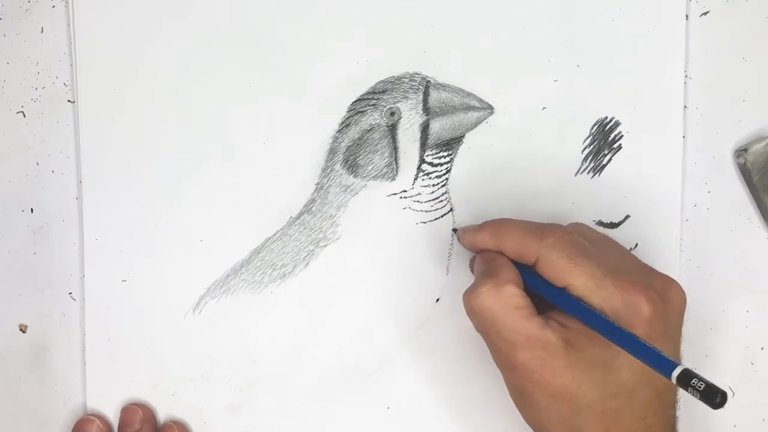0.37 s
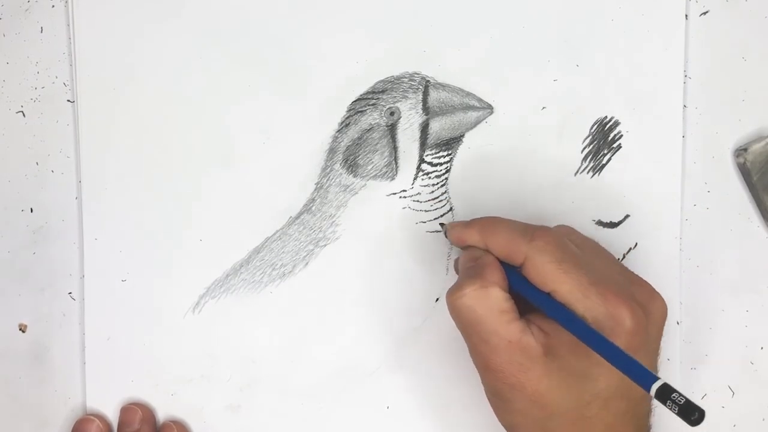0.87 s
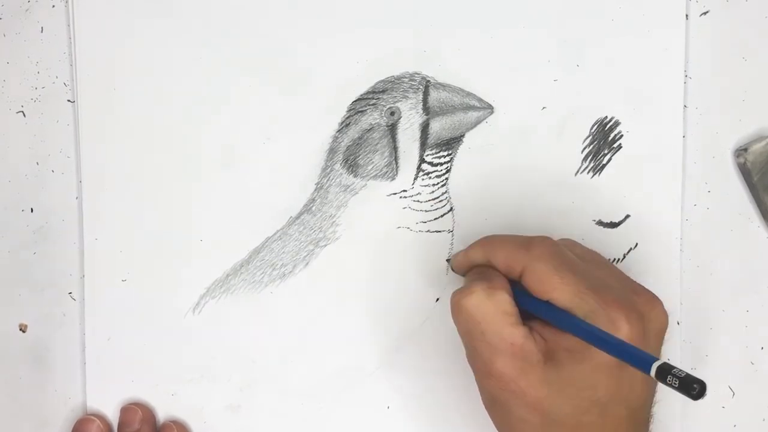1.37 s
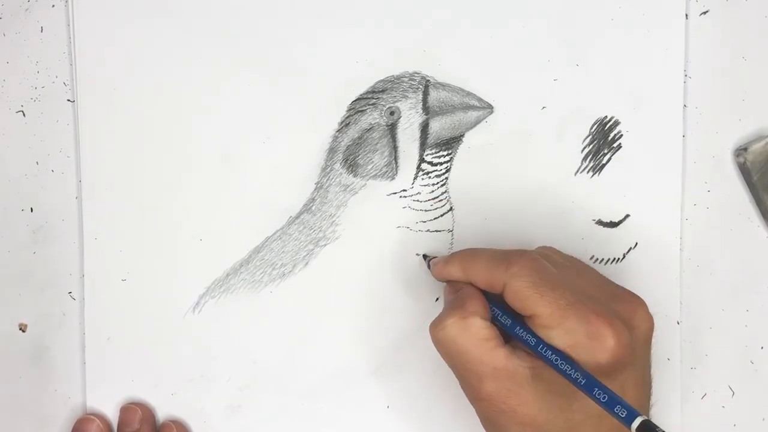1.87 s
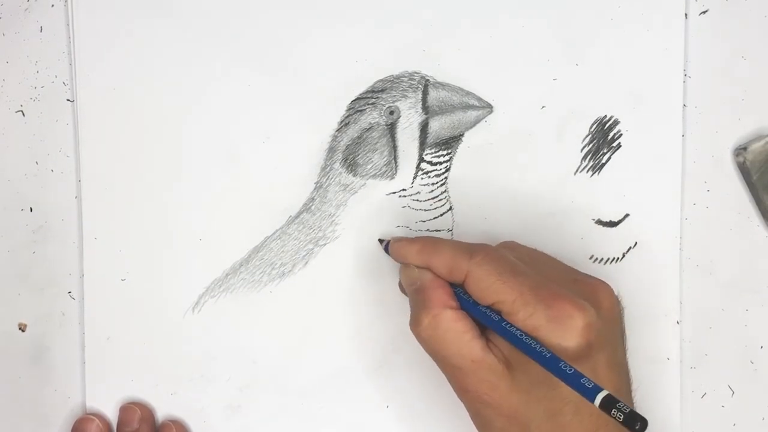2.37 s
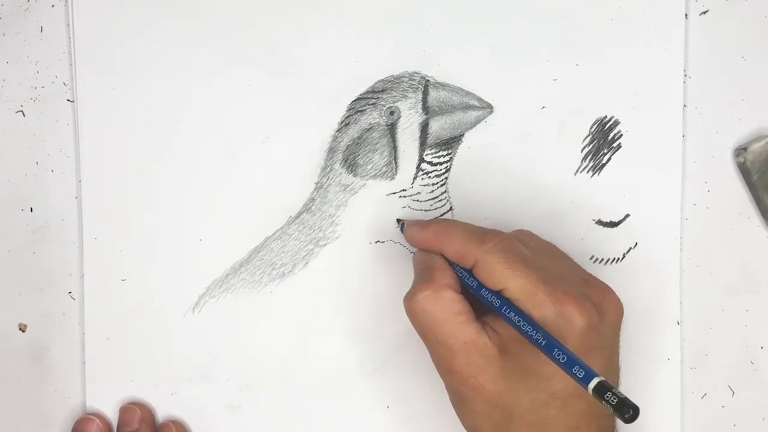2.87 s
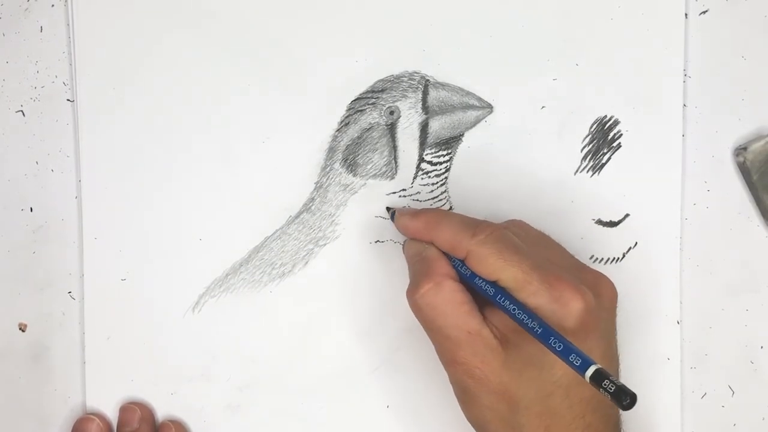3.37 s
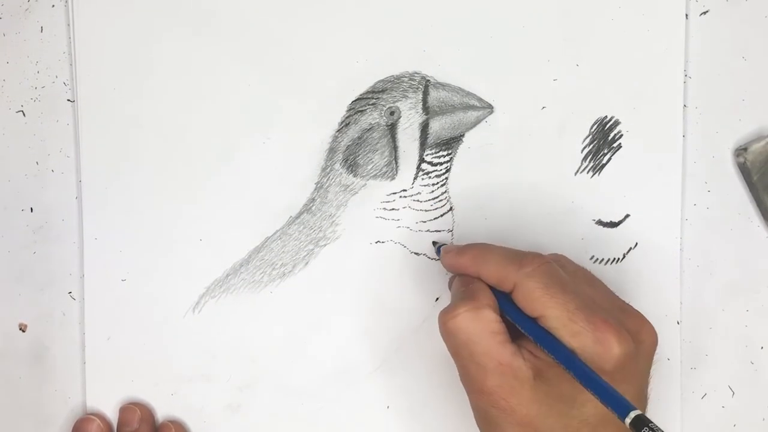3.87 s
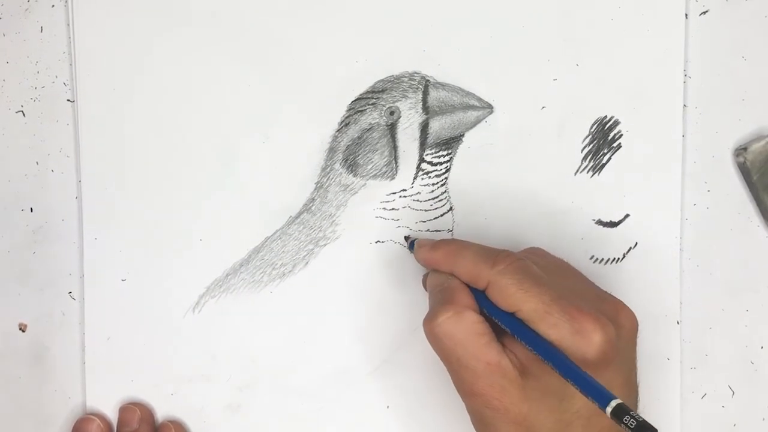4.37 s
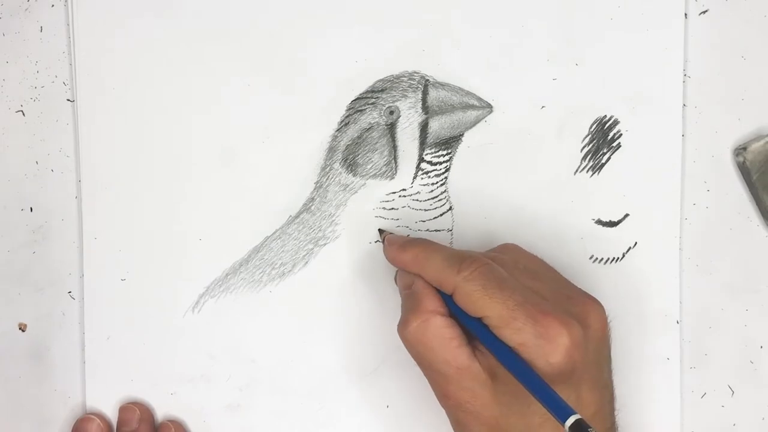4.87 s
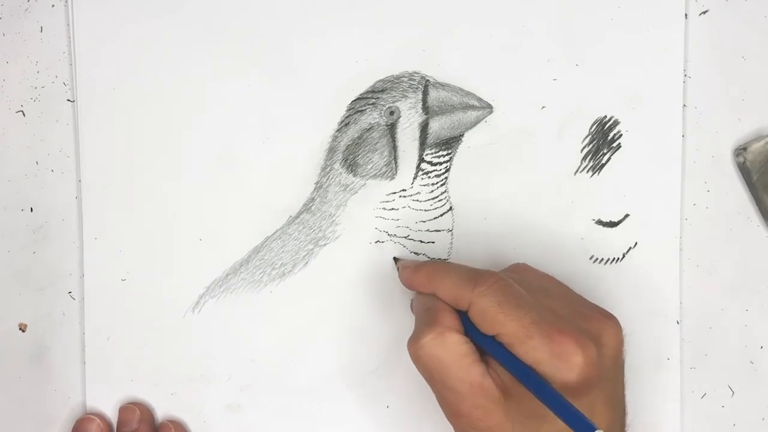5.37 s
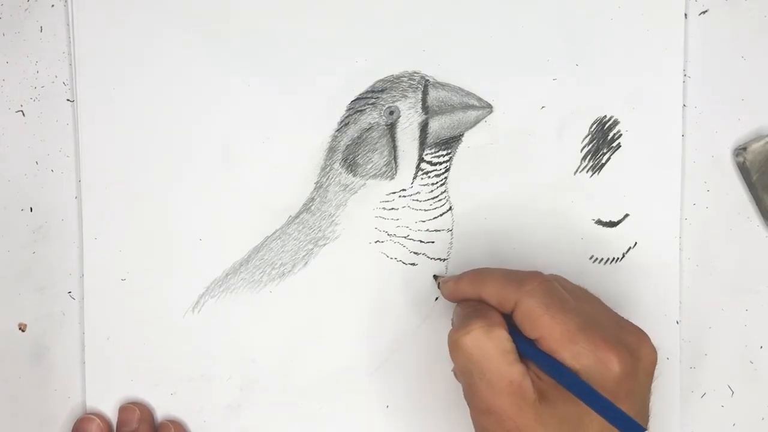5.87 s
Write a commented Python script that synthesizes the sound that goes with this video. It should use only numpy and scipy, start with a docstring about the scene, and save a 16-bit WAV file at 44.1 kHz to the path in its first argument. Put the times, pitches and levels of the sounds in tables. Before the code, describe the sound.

In a quiet indoor room, a nearby microphone catches a pencil sketching brief, hissy strokes, several per second. They begin lightly, grow strongest around two seconds, thin out around three and a half, then continue unevenly and more softly toward the end. Tip clicks, tiny hollow knocks and low hand bumps punctuate the drawing, while the desk rumbles faintly under the sliding hand.

```python
"""A desk in a quiet room: a soft graphite pencil draws short quick lines on paper, heard from close by.
Each stroke is noise from dense tiny slips of the tip, coloured as a hiss and ringing the shaft and sheet.
Ticks are very short broad scrapes; hollow knocks are small decaying rings, rough from rubbing.
Landings of the hand or tip ring the desk top and slap the sheet, and the hand's drag shakes the desk.
Shaped noise and wavering sine hums make the room underneath."""
import sys
import numpy as np
from scipy import signal
from scipy.fft import rfft, irfft, next_fast_len
from scipy.io import wavfile
from scipy.ndimage import uniform_filter1d, minimum_filter1d, map_coordinates

SR = 44100
rng = np.random.default_rng(int(sys.argv[2]) if len(sys.argv) > 2 else 0)


def makeup_ratio(level_db):
    """Linear amplitude ratio for a level in decibels (20 dB per factor of ten)."""
    decades = np.asarray(level_db, float) / 20
    return 10 ** decades


def master(y):
    """Save y as 16-bit WAV."""
    cut = np.clip(np.atleast_2d(y).T, -1, 1)
    pcm = np.round(cut * 32767)  # scale
    wavfile.write(sys.argv[1], SR, pcm.astype(np.int16))


N = 264600  # length [samples]

# Pencil strokes: (fastest point [s], speed-up [ms], slow-down [ms], scrape level at the fastest point [dB],
# landing level relative to that [dB], extra ring of the shaft [dB])
STROKES = [(0.067, 31, 29, -57.0, -13, 2.5), (0.186, 73.5, 74, -47, -10.5, 0),
           (0.353, 51, 16, -64.5, 0, 0.5), (0.448, 93, 59, -45.0, -14.5, -2),
           (0.536, 33, 59, -71, -22.0, 5), (0.642, 63, 66, -45, -13, -2),
           (0.821, 33, 54, -60.0, -13.0, 2.5), (0.921, 56, 49, -44.5, -16, -2.5),
           (1.028, 70, 28, -44.5, -9.5, -3.5), (1.099, 39, 27, -43.5, -12.5, -3),
           (1.195, 61, 43, -46.5, -6, -1), (1.281, 59, 21, -49.5, -22.0, 1), (1.355, 41, 52, -47.0, -6, -2),
           (1.653, 73.5, 40.5, -41.5, -10.5, -3.5), (1.754, 51, 18, -71.5, -19, 5.5),
           (1.85, 43, 77, -42.0, -20, -0.5), (1.97, 44, 58, -66, -23.0, -6.5),
           (2.097, 102, 66, -39.5, -24.5, 0), (2.235, 100, 13, -68.5, -7, 5.5),
           (2.333, 99, 35, -47.0, -19, 2), (2.382, 17, 48, -69.5, -16, 4), (2.519, 90, 44, -64.5, -4, -2),
           (2.599, 76, 72, -43.5, -16.5, -2.5), (2.756, 79, 33, -46.0, -5, -4),
           (2.864, 63, 54, -42.0, -13.5, -4), (3.016, 91, 38.5, -46.5, -17.5, 2),
           (3.141, 62.5, 69, -42.5, -16.5, -4), (3.322, 108, 51, -49, -21.5, 4),
           (3.657, 92, 80, -53.5, -24.0, 5), (3.783, 54, 58, -57, -5, 5),
           (3.843, 9.3, 73, -78, -17.5, 12.0), (3.916, 27, 119, -81, -10, 2.5),
           (4.038, 36, 43, -46.5, -21, -0.5), (4.384, 53.6, 62, -45.5, -16, -0.5),
           (4.487, 47, 97, -55.5, -23.0, -0.5), (4.589, 64, 53, -49.0, -20, 0.5),
           (4.732, 84, 46, -48.0, -8.5, 2.5), (4.859, 54, 48, -64, 0.5, 0.5), (4.935, 69, 54, -48, -24, 1),
           (5.055, 75, 25, -69, -12.0, 3), (5.132, 75, 39, -45.0, -23, 2.5),
           (5.195, 32, 130, -71.5, -1.5, 5), (5.376, 41, 92, -48.5, -28, -0.5),
           (5.553, 88, 42, -53, -8.5, 6.5), (5.661, 69, 37, -57.5, -7, 3.5), (5.756, 55, 70, -57, -14, 3.5),
           (5.864, 38, 74, -48.5, -17, 0), (5.955, 26, 20, -57.5, 1, 6.5)]
# Colour of the tip's scrape: (frequency [Hz], relative density [dB per Hz])
TIP_COLOUR = [(1500, -31), (3900, -18.5), (6500, -12.5), (8100, -10), (9600, -1), (10500, 1.5),
              (11800, 2.5), (15800, 3.5), (16400, -74)]
# Modes of the shaft and the sheet under the tip, in five groups: (frequency [Hz], width [Hz], relative level [dB])
SHAFT_GROUPS = [
    [(350, 63, -5.5), (464, 23, -0.5), (604, 97, -9.5), (803, 320, -10), (994, 170, -3), (1139, 176, -6)],
    [(1383, 260, 3), (2160, 900, -3)],
    [(3297, 560, 0)],
    [(5140, 900, 8), (6040, 2050, 3.5)],
    [(7310, 1400, -2), (9130, 1240, 0.5)],
]
# Usual level of each mode group: (level over the scrape [dB])
RING_DB = [-9, -17.5, -17.5, -11.5, -6.5]
# How far each mode group follows a stroke's extra ring: (share [ratio])
RING_SHARE = [1.09, 1.05, 0.94, 0.78, 0.87]
# How each mode group follows the push within a stroke: (power of relative strength [exponent])
PRESS_POWER = [0.35, -0.014, -0.37, -0.2, -0.027]
# Slow drift of the shaft's tone: (time [s], lowest group [dB], upper groups [dB])
TONE = [(0, -1, 1), (0.65, 0.5, 1), (0.92, 5, -2), (1.15, -6, 0.5), (1.6, 0.5, -1), (2.1, -1.5, 3),
        (2.6, 2.5, 0.5), (3.0, 0, 3.5), (3.65, 1.5, 0.5), (4.0, -3.5, 3.5), (4.55, 2.5, -3), (4.9, -1, -2),
        (5.15, 4, -5), (5.55, -1.5, -2.5), (6, 1.5, -1.5)]
# How far each mode group takes up that drift: (share of lowest [ratio], share of upper [ratio])
TONE_SHARE = [(1, 0.11), (0.18, 0), (0, 0.045), (0.14, 1), (0, 0.15)]
# The tip touches down or catches: (time [s], drive level [dB], length [ms])
TICKS = [(1.515, -48.5, 1.3), (1.564, -53, 10), (2.206, -66, 3.3), (2.33, -52, 16), (3.689, -43.5, 16),
         (3.913, -60, 6), (3.991, -49, 2.4), (4.299, -47.5, 4.1), (4.811, -56, 4.9), (5.578, -54, 5)]
# Short hollow knocks: (time [s], drive level [dB], rise [ms], favoured pitch [Hz])
KNOCKS = [(1.218, -42, 7.9, 790), (1.245, -45, 1.9, 750), (2.151, -40, 1, 546), (2.205, -48.5, 4, 613),
          (2.379, -46, 8.1, 440), (3.171, -41.5, 7.1, 544)]
# Modes that the hollow knocks ring: (frequency [Hz], relative level [dB], t60 [s])
HOLLOW_MODES = [(458, -2, 0.15), (603.5, -0.5, 0.1), (768, 0, 0.08)]
# The hand or tip lands on the desk: (time [s], blow strength [dB], contact [ms])
THUDS = [(1.569, -50, 0.41), (1.572, -38, 3.64), (3.997, -42, 5.7), (4.277, -48.5, 0.67),
         (4.2799, -33, 1.2), (4.294, -38, 1.5), (4.679, -43.5, 0.72)]
# Modes of the struck desk: (frequency [Hz], relative level [dB], t60 [s])
DESK_MODES = [(68.4, -14.5, 0.29), (131, 1, 0.15), (313, 9, 0.011), (900, -13, 0.032), (1410, -2, 0.0036)]
# The hand's drag shakes the desk: (time [s], desk top level [dB], legs level [dB])
SHAKE = [(0, -62.5, -63), (0.5, -61, -58.5), (0.85, -61, -68), (1.4, -58.5, -59.5), (1.901, -62, -62),
         (2.801, -58, -67), (3.5, -62, -60), (4.2, -61.5, -70), (4.5, -59, -72), (5.1, -58.5, -67),
         (5.4, -61.5, -65.5), (6, -60.5, -66.5)]
# Modes of the desk top under the sliding hand: (frequency [Hz], width [Hz], relative level [dB])
DRAG_MODES = [(125.8, 30.5, 3), (223.4, 13.2, -7), (351, 183, -15)]
# Colour of the room noise: (frequency [Hz], relative density [dB per Hz])
ROOM_COLOUR = [(59, -44), (100, -10.5), (146, -8.5), (173, -8.5), (201, -4.5), (243, -6.5), (282, -18.5),
               (404, -28.5), (479, -17.5), (591, -24), (657, -20), (1930, -41.5), (4050, -40), (5120, -42),
               (15700, -45)]
# Hums in the room: (frequency [Hz], usual peak level [dB], waver rate [knots per s], waver depth [dB])
HUM = [(43.1, -60.5, 2.95, -2), (60.1, -71, 2.94, 6), (81.6, -79.5, 5, -1.5), (232.4, -67.5, 6.8, 3),
       (454, -74.5, 11, 3), (2370, -89, 250, 5)]


def unit(x):
    """Scales a signal to rms 1."""
    return x / np.sqrt(np.mean(x ** 2) + 1e-20)


def filtered(x, response):
    """Shapes a signal by a complex response of frequency."""
    m = next_fast_len(N + SR // 2)
    return irfft(rfft(x, m) * response(np.fft.rfftfreq(m, 1 / SR)), m)[:N]


def colour(points):
    """Gain curve through frequency and dB points on a log frequency axis."""
    hz, db = np.transpose(points)
    return lambda f: makeup_ratio(np.interp(np.log(f + 1), np.log(hz + 1), db))


def modes(table):
    """Response of causal resonances summed with alternating signs."""
    def response(f):
        total = 0
        for k, (hz, width, db) in enumerate(table):
            total = total + (-1) ** k * makeup_ratio(db) * 1j * f * width / (hz * hz - f * f + 1j * f * width)
        return total
    return response


def wobble(rate):
    """Smooth random curve with the given number of knots a second."""
    knots = rng.standard_normal(int(N * rate / SR) + 4)
    return map_coordinates(knots, [np.arange(N) * rate / SR])


def strokes():
    """Scrape amplitude: each stroke lands, speeds up to its peak, slows and lifts."""
    lift_db = -18.5  # under the fastest point
    edge_s = 0.009  # the tip meets and leaves the sheet
    power = np.zeros(N)
    for peak, up_ms, down_ms, peak_db, land_db, _ in STROKES:
        land, lift = peak - up_ms / 1000, peak + down_ms / 1000
        span = slice(int(land * SR), int(lift * SR))
        t = np.arange(N)[span] / SR
        rise = np.sin(np.pi / 2 * np.clip((t - land) / (peak - land), 0, 1))
        fall = np.sin(np.pi / 2 * np.clip((lift - t) / (lift - peak), 0, 1))
        db = peak_db + np.where(t < peak, land_db * (1 - rise), lift_db * (1 - fall))
        edge = np.clip(np.minimum(t - land, lift - t) / edge_s, 0, 1)
        power[span] += (makeup_ratio(db) * edge) ** 2
    return np.sqrt(power)


def slips(spread_db, clump_db, clump_rate):
    """Sizes of dense micro-slips, uneven and clumped by the paper's tooth."""
    return makeup_ratio(spread_db * rng.standard_normal(N) + clump_db * wobble(clump_rate))


def patchy(x, depth_db, broad_db=1.5):
    """The contact patch keeps changing, so narrow and broad bands swell and fade on their own; rms is 1."""
    z = signal.stft(x, nperseg=256)[2]

    def field(bins, frames):
        across = uniform_filter1d(rng.standard_normal(z.shape), bins, axis=0)
        return unit(uniform_filter1d(across, frames, axis=1))
    gain = makeup_ratio(depth_db * field(bins=5, frames=9) + broad_db * field(bins=12, frames=40))
    return unit(signal.istft(z * gain, nperseg=256)[1][:N])


def pencil():
    """The slips radiate from the tip and ring the modes, more in some strokes than in others."""
    size = slips(spread_db=3.5, clump_db=1.0, clump_rate=370)
    scrape = filtered(size * rng.standard_normal(N), colour(TIP_COLOUR))
    sound = patchy(scrape, depth_db=1.2)
    strength, t = strokes(), np.arange(N) / SR

    # The hand bears down hardest a little after the fastest point
    press_lag_ms = 12
    nearby_peak = uniform_filter1d(-minimum_filter1d(-strength, size=SR // 8), size=SR // 30)
    relative = np.clip(strength / (nearby_peak + 1e-9), 0.1, 1)
    press = np.roll(relative, round(press_lag_ms * SR / 1000))

    fastest, *_, ring_db = np.transpose(STROKES)
    stroke_db = np.interp(t, fastest, ring_db)
    tone_s, *tone = np.transpose(TONE)
    low_db, upper_db = [np.interp(t, tone_s, column) for column in tone]
    groups = zip(SHAFT_GROUPS, RING_DB, RING_SHARE, TONE_SHARE, PRESS_POWER)
    for group, db, share, (low, upper), power in groups:
        top_hz = group[-1][0]
        steep = modes([(top_hz, top_hz, 0)])  # steepens the skirts of the group
        ring = filtered(size * rng.standard_normal(N), lambda f: modes(group)(f) * steep(f))
        level_db = db + share * stroke_db + low * low_db + upper * upper_db
        sound = sound + makeup_ratio(level_db) * press ** power * patchy(ring, depth_db=2.26)
    return strength * sound


def ticks():
    """A touch-down or a catch of the tip is a very short broad scrape."""
    out, t = np.zeros(N + SR), np.arange(3000) / SR
    for s, db, ms in TICKS:
        envelope = (1 - np.exp(-t / 0.0014)) * np.exp(-(t * 1000 / ms) ** 2)
        out[round(s * SR):][:len(t)] += makeup_ratio(db) * envelope * rng.standard_normal(len(t))
    # Low cut at 2 kHz, high cut at 12 kHz
    return filtered(out[:N], lambda f: 1j * f / (2000 + 1j * f) / (1 + 1j * f / 12000))


def knocks():
    """Small muffled rings, rough from rubbing; each knock favours the modes near one pitch."""
    focus_db = 62  # a mode one octave from the favoured pitch is this much weaker
    out, t = np.zeros(N + SR), np.arange(SR // 4) / SR
    for s, db, rise_ms, favoured_hz in KNOCKS:
        for hz, mode_db, t60 in HOLLOW_MODES:
            smooth = uniform_filter1d(rng.standard_normal(len(t)), size=200)
            drift = unit(uniform_filter1d(smooth, size=200))  # roughens the phase
            ring = np.sin(2 * np.pi * hz * t + 0.75 * drift + 6 * rng.random())
            ring = ring * (1 - np.exp(-t * 1000 / rise_ms))
            off_pitch_db = focus_db * np.log2(hz / favoured_hz) ** 2
            out[round(s * SR):][:len(t)] += makeup_ratio(db + mode_db - off_pitch_db - 60 * t / t60) * ring
    return out[:N]


def reverb(x, t60):
    """A short damped room tail: decaying noise, dulled above 6 kHz, after a brief delay."""
    delay = 200  # samples
    t = np.arange(SR // 3) / SR
    decay = rng.standard_normal(len(t)) * makeup_ratio(-60 * t / t60)
    padded = np.pad(decay, (delay, N - len(t) - delay))
    tail = filtered(padded, lambda f: 1 / (1 + 1j * f / 6000))
    return signal.fftconvolve(x, tail[:len(t)] / np.linalg.norm(tail))[:N]


def desk():
    """Soft blows ring the desk top and slap the sheet on it, and the hand's drag shakes it."""
    blows, slaps, t = np.zeros(N + SR), np.zeros(N + SR), np.arange(SR // 3) / SR
    for s, db, contact_ms in THUDS:
        push = np.sin(np.pi * np.clip(t * 1000 / contact_ms, 0, 1)) ** 2  # one smooth push
        blows[round(s * SR):][:len(t)] += makeup_ratio(db) * push / push.sum()
        slaps[round(s * SR):][:len(t)] += makeup_ratio(db - 3.5 - 60 * t / 0.045) * rng.standard_normal(len(t))
    ring = np.zeros(len(t))
    for k, (hz, db, t60) in enumerate(DESK_MODES):
        ring += (-1) ** (k + 1) * makeup_ratio(db - 60 * t / t60) * np.sin(2 * np.pi * hz * t)
    thud = signal.fftconvolve(blows, ring)[:N]
    slap = filtered(slaps[:N], lambda f: modes([(750, 1100, 0)])(f) ** 2)

    # The drag grows with the scrape, by a power of its smoothed strength
    drag_follows, smooth_s = 0.29, 0.13
    smoothed = uniform_filter1d(strokes(), size=round(smooth_s * SR))
    effort = (smoothed + makeup_ratio(-74)) ** drag_follows
    drag = unit(effort * filtered(rng.standard_normal(N), modes(DRAG_MODES)))
    legs = unit(filtered(rng.standard_normal(N), lambda f: modes([(70, 35, 0)])(f) ** 2))
    shake_s, *levels = np.transpose(SHAKE)
    top_gain, legs_gain = [makeup_ratio(np.interp(np.arange(N) / SR, shake_s, db)) for db in levels]
    return thud + slap + top_gain * drag + legs_gain * legs


def room():
    """Steady room noise with a few sine hums that waver in level and phase."""
    t = np.arange(N) / SR
    air = makeup_ratio(-63.5) * unit(filtered(rng.standard_normal(N), colour(ROOM_COLOUR)))
    hums = np.zeros(N)
    for hz, db, rate, waver_db in HUM:
        level = makeup_ratio(db + waver_db * wobble(rate))
        hums += level * np.sin(2 * np.pi * hz * t + 0.58 * wobble(rate) + 6 * rng.random())
    return air + hums


def scene():
    """Pencil, ticks and knocks with their room tail, over the desk and the room."""
    near = pencil() + ticks() + knocks()
    tail = makeup_ratio(-17) * reverb(near, t60=0.18)
    return (near + tail + desk() + room())[None]


def low_pass(x):
    """Removes everything above the highest recorded frequency."""
    return signal.sosfilt(signal.butter(12, 16430, fs=SR, output="sos"), x)


def record(dry):
    """Delivers the finished mix."""
    return low_pass(dry)


dry = scene()
out = record(dry)
master(out)
```